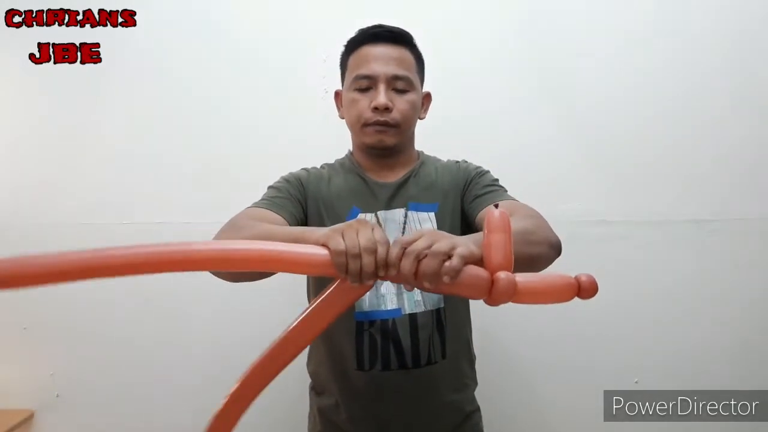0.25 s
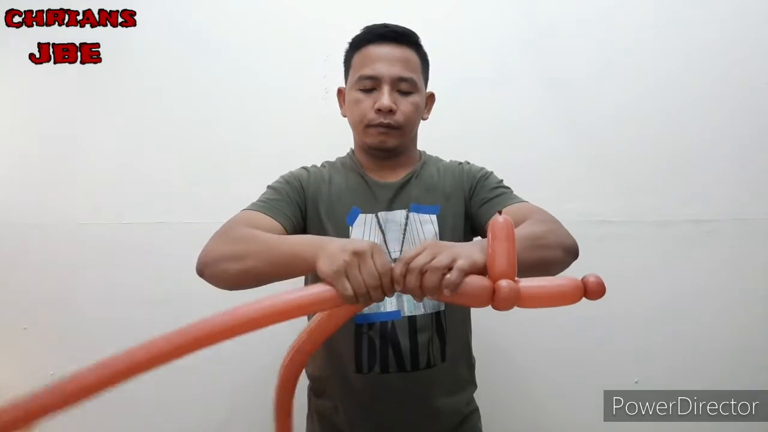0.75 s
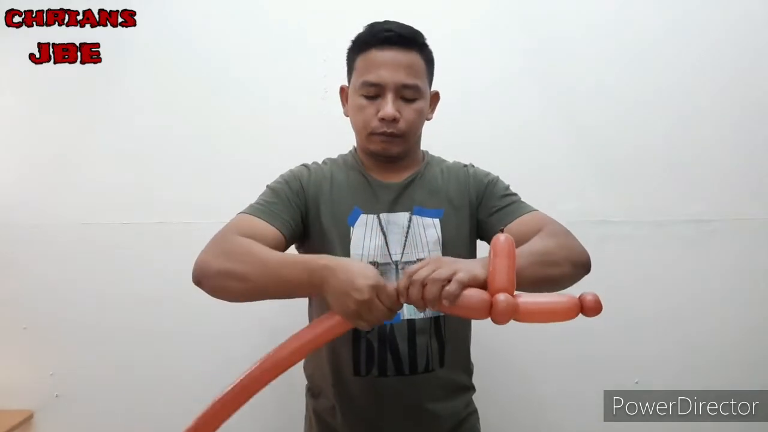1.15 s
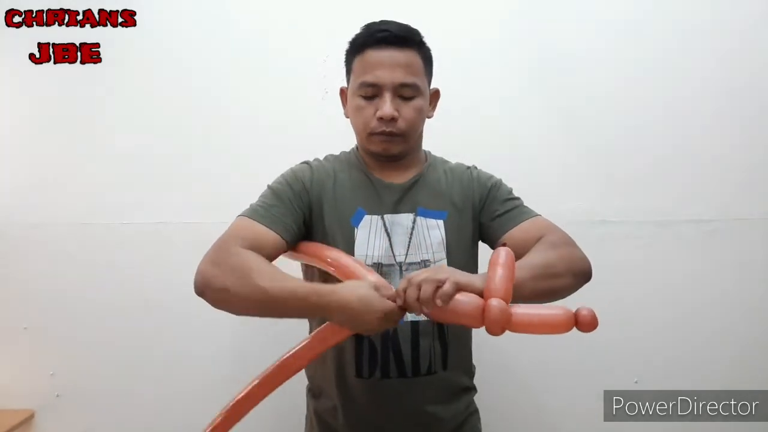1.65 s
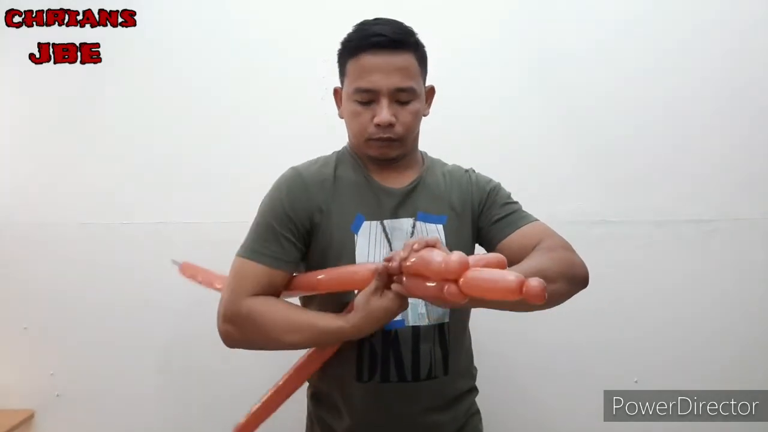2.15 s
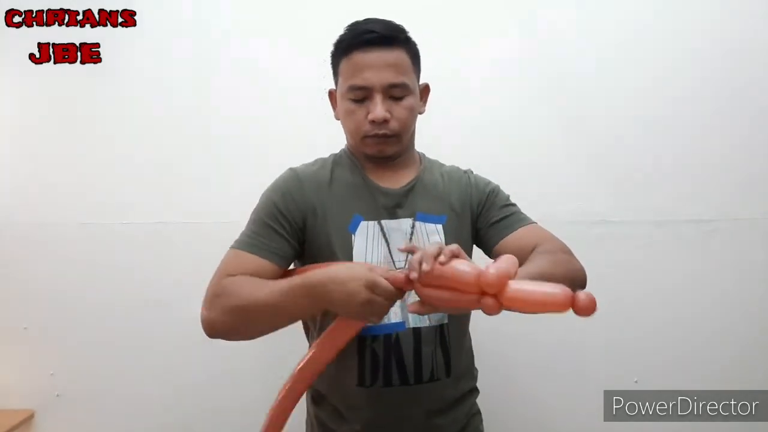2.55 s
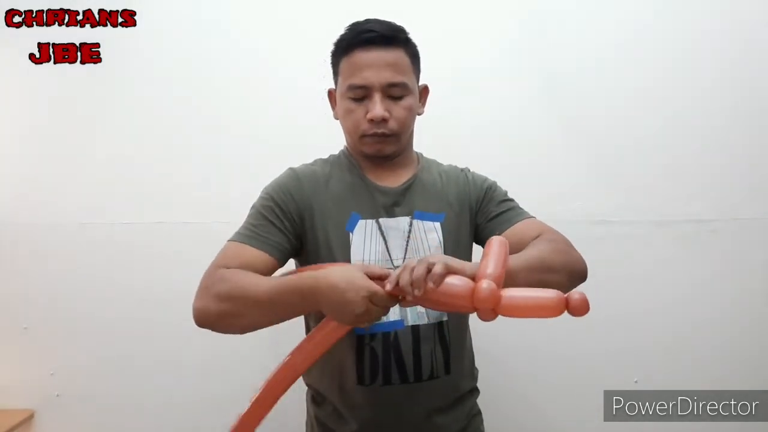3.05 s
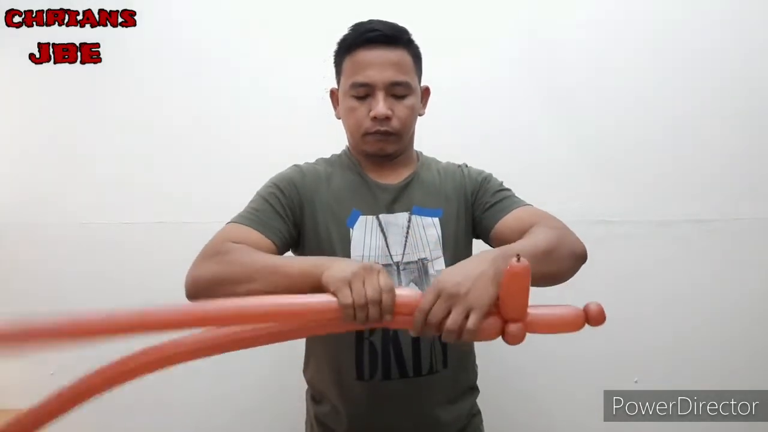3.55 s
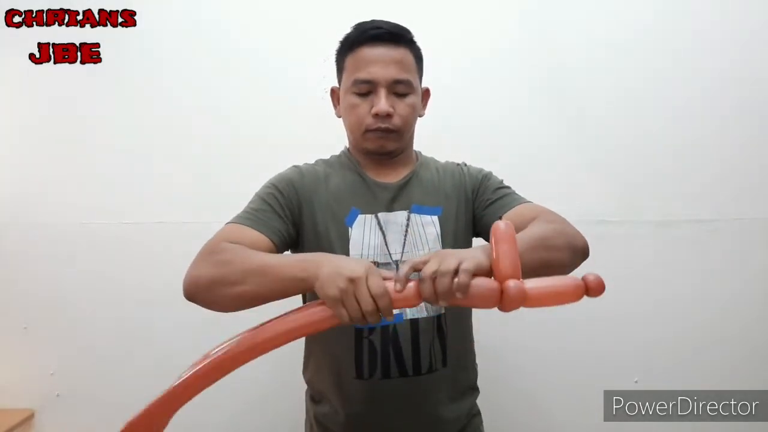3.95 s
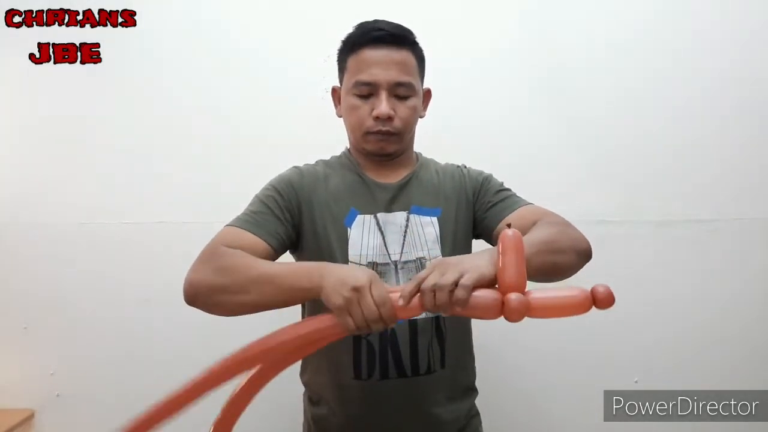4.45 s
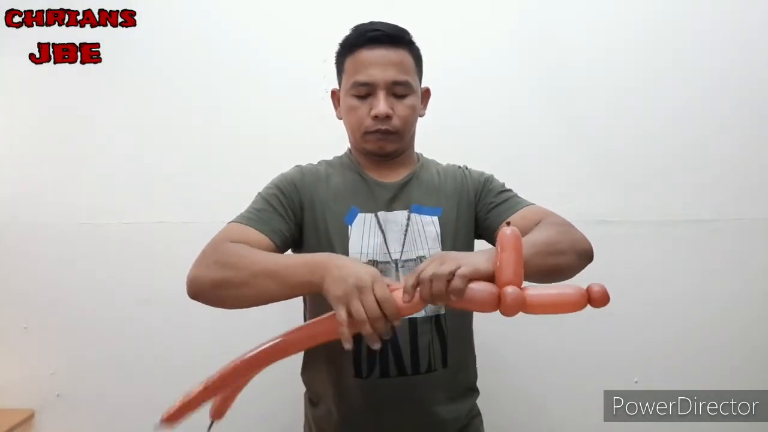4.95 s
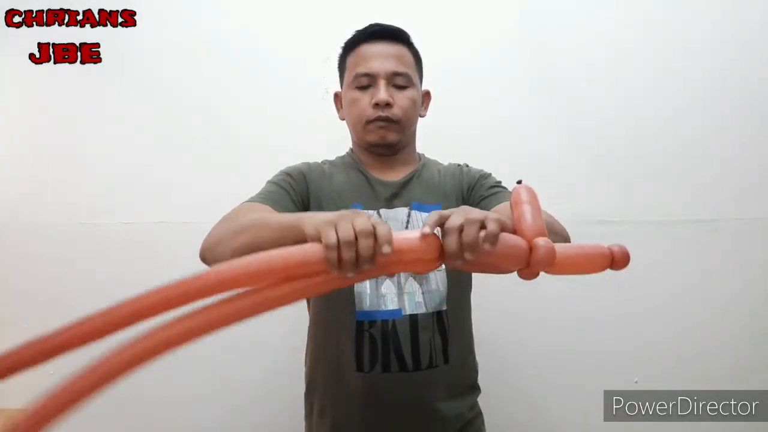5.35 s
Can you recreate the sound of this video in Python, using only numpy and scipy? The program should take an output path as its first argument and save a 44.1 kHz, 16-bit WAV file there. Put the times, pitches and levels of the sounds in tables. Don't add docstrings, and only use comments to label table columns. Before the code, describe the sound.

Hands twist long air-filled latex balloons in a small bare room, a few steps from a phone microphone. A couple of early snaps give way to faint ticks, then finger hiss swells into a dense run of sharp creaks and pops. Duller hollow knocks follow, then scattered snaps, ending with a loud squeaky pop. Walls add short, quickly cut reverberation over faint rumble.

```python
import sys
import numpy as np
from scipy import signal
from scipy.fft import rfft, irfft, next_fast_len
from scipy.io import wavfile
from scipy.ndimage import map_coordinates

SR = 44100
rng = np.random.default_rng(int(sys.argv[2]) if len(sys.argv) > 2 else 0)


def store_pcm(level_fs):
    pcm = np.round(np.clip(level_fs, -1, 1) * 32767).astype(np.int16)
    wavfile.write(sys.argv[1], SR, np.atleast_2d(pcm).T)


def volts_from_decibels(level):
    exponent = np.asarray(level, float) / 20
    return 10 ** exponent


N = 246222

# [f/Hz, level/dB per Hz]
AIR_SPECTRUM = [(22, -29), (38, -12.5), (55, 4), (100, -1), (160, -4), (220, 2.5), (310, -6.5),
                (450, -10.5), (1000, -18.5), (2000, -19), (4500, -33), (8000, -20.5), (10000, -33),
                (16000, -28.5)]
AIR_DB = -67
# [t/s, peak level/dB, f/Hz]
THUDS = [(1.537, -57, 281.5), (1.581, -54, 246), (1.601, -57, 71), (1.69, -53, 320), (2.403, -48, 126),
         (2.55, -61, 69.8), (2.692, -62, 68), (3.2, -67, 61), (3.412, -46, 58.6), (3.408, -33.5, 136.4),
         (3.425, -26, 254.8), (3.55, -39, 282), (3.559, -54.5, 70.4), (4.1, -36, 263), (4.131, -73, 60),
         (5.044, -39, 258), (5.291, -32, 264), (5.297, -53.5, 58.8), (3.196, -27, 516), (2.3, -56, 148.7),
         (2.6, -56.5, 141.5), (4.36, -58, 150)]

# [t/s, hiss level/dB]
STROKES = [
    [(0.9, -93), (1.05, -74.5), (1.24, -71), (1.3, -66), (1.5, -69.5), (1.66, -71.5), (1.78, -60.5),
     (1.988, -53), (2.3, -56.5)],
    [(4.8, -79.5), (4.858, -55), (4.996, -55.5), (5.06, -38)],
    [(3.95, -79), (4.03, -64.5), (4.2, -60), (4.3, -80.5), (4.35, -64), (4.45, -76), (4.6, -83)],
    [(5.48, -90), (5.58, -64.5)],
]
# [f/Hz, level/dB per Hz]
HISS_SPECTRUM = [(2500, -40), (3500, -17.5), (6000, -13.5), (7200, -8), (8200, -2), (9000, -11),
                 (9700, -13.5), (14000, -10.5), (15500, -16), (16300, -35)]
# [f/Hz, level/dB per Hz]
RUSTLE_SPECTRUM = [(290, -8.5), (500, -8.5), (661, -14), (858, -12), (963, -18), (1840, -1.5),
                   (5000, -12.5), (6500, -26), (11000, -120)]
RUSTLE_DB, GRIP_DB = -6, -63.5
LIGHT_DB_PER_DB = 2.1

# [t/s, f/Hz, peak level/dB, hold/s, fade/dB per s]
SQUEAKS = [(.2, 2170, -63, .05, 200), (0.23, 1900, -69, .07, 300), (.94, 596, -70.5, 0.039, 300),
           (3.41, 1900, -30, 0.0089, 300), (3.41, 2350, -33, 0.036, 300), (3.25, 520, -46, 0.029, 148),
           (4.1, 1062, -43, 0.031, 222), (4.365, 1063, -54.5, 0.085, 420), (5.297, 2300, -24.5, 0.042, 325),
           (5.28, 1650, -27, 0.0073, 262.5), (5.39, 2600, -45, 0.029, 300), (5.3, 535, -33.5, 0.031, 158),
           (2.25, 2150, -40, 0.043, 300), (5.3, 2800, -39, 0.039, 152)]
SWELL_S, SAG_PER_DB = 0.018, 0.0008
BREATHY_HZ = 2200

# [t/s, level/dB]
WALLS = [(.0046, 1), (.0066, -1), (0.0122, -2), (0.0141, 2), (0.02, -0.5), (0.021, -10.5)]
# [f/Hz, t60/s]
ROOM_T60 = [(200, 1), (600, 0.81), (2000, 0.67), (5000, 0.67), (12000, 0.65)]
# [f/Hz, likeness/1]
LIKENESS = [(100, 0.44), (400, 0.75), (800, 0.5), (2000, 0.32), (8000, 0.19)]
TAIL = SR // 3
WET_DB = 11

# [f/Hz, level/dB per Hz]
MEMBRANE = [(120, -59), (340, -10), (600, 1), (1000, 3), (2000, 4.5), (3500, -2), (5500, -9.5),
            (9000, -17.5), (20000, -82.5)]
# [f/Hz, level/dB per Hz]
CRACK = [(1200, -46), (3000, -3.5), (5000, -4), (6700, -6), (8100, 1.5), (9400, -13), (13000, -11.5),
         (15500, -17), (20000, -69)]
# [t/s, mode f/Hz]
TUBE = [(0.7, 635), (1.75, 300), (2.24, 722), (2.7, 730), (3.0, 590), (3.2, 580), (3.4, 278), (3.45, 468),
        (3.64, 490), (3.9, 765), (4.1, 534), (4.14, 324), (4.345, 444), (4.63, 382), (4.67, 556),
        (5.04, 507), (5.1, 428), (5.28, 812)]
OTHERS_SHARP = 17
SLACK_TILT = 0.069

# [t/s, peak level/dB, skin mode f/Hz, tube level/dB, crack level/dB]
SNAPS = [(-0.025, -25.5, 2686, -46, -6), (0.11, -26, 1735, -50, -0.5), (0.123, -24, 1930, -20, -9),
         (0.707, -50.5, 1240, -22, -9), (1.249, -54, 2570, -16, 2), (1.751, -48, 1126, -20, -22.5),
         (1.913, -43.5, 1885, -34, -16), (2.599, -16, 2184, -23, -12), (2.656, -28.5, 1660, -25, 5.5),
         (2.828, -35, 2118, -46, 4.5), (2.989, -33, 1525, -24, 5), (3.584, -19.5, 1647, -11.5, -34.5),
         (3.892, -29, 1820, -23, -32.5), (4.098, -22.5, 1592, -12, -7), (4.137, -44, 2473, -0.5, 10.5),
         (4.626, -23.5, 1690, -12.5, -3.5), (4.825, -42.5, 2030, -19, 2.5), (4.949, -51, 2880, -13, 10),
         (4.999, -52.5, 2200, -6, 15), (5.1, -42, 2084, 2.5, -3), (5.278, -1, 1548, -64, -4.5)]
# [t/s, peak level/dB, skin mode f/Hz, tube level/dB, crack level/dB]
FACING = [(0.17, -39.5, 1250, -38, 8.5), (1.993, -39.5, 2130, -38, 11), (2.24, -21.5, 1978, -62, 0.5),
          (2.349, -26, 2140, -22.5, -32), (2.549, -3.5, 1427, -22, -4), (2.684, -6.5, 1639, -33.5, 0.5),
          (2.808, -32.5, 1430, -40, 4.5), (3.165, -20.5, 1666, -20, -23), (3.413, -9.5, 2113, -25, -5.5),
          (3.942, -29.5, 2110, -11, -19), (4.669, -37, 1820, -9, 7), (5.038, -15.5, 1850, -15, -6.5)]
# [t/s, peak level/dB, skin mode f/Hz, tube level/dB, crack level/dB]
SLACK = [
    (3.012, -20.5, 980, -12.5, -11.5),
    (3.196, -15.5, 1370, -7, -18.5),
    (3.403, -18.5, 1334, -6, 0),
    (3.45, -30, 1080, 7, -8),
    (3.542, -24, 1030, -7, -12.5),
    (4.345, -40.5, 794, -7, -28),
    (4.36, -46.5, 857, 0.5, -25),
]
# [t/s, peak level/dB, skin mode f/Hz, tube level/dB, crack level/dB]
NEAREST = [
    (2.366, -22, 1900, -29.5, 1),
    (2.393, -3.5, 1386, -15.5, -6),
    (2.43, -9, 1880, -16.5, -0.5),
    (3.641, -20, 1980, -15.5, -8.5),
]
# [t/s, peak level/dB, skin mode f/Hz, crack level/dB]
TICKS = [
    (.433, -52, 4270, 0),
    (.61, -65.5, 2620, -20),
    (.759, -50, 3500, -2),
    (.902, -59, 3300, -25),
]
TICK_TUBE_DB = -33
# [t/s, peak level/dB]
CREEP = [
    (3.385, -47),
    (4.087, -41),
    (5.024, -38),
    (5.262, -55),
]
# [skin mode f/Hz, tube level/dB, crack level/dB]
CREEP_COLOUR = (2000, -8.5, 3.5)
# [skin mode f/Hz, tube level/dB, crack level/dB]
CREAK_COLOUR = (2060, -14.5, -5)
CREAK_S, CREAK_GAP_S, CREAK_DB, CREAK_SWELL_DB = 2.249, 0.013, -28, 2

# [f/Hz, left minus right level/dB]
LEFT_RE_RIGHT = [(60, 3.5), (250, 2), (1000, 2.5), (4500, 4), (8500, 3), (13000, -2)]
TOP_HZ = 15900


def unit_rms(x):
    return x / np.sqrt(np.mean(x ** 2) + 1e-20)


def along(points, hz):
    f, v = np.transpose(points)
    return np.interp(np.log(hz + 1), np.log(f + 1), v)


def curves(rows):
    s, *cols = np.transpose(rows)
    n = np.arange(round(s[0] * SR), round(s[-1] * SR))
    return n, [np.interp(n / SR, s, c) for c in cols]


def wobble(rate_hz):
    knots = rng.standard_normal(int(N * rate_hz / SR) + 4)
    return map_coordinates(knots, [np.arange(N) * rate_hz / SR])


def filtered(x, response):
    m = next_fast_len(x.shape[-1] + 4096)
    spectrum = rfft(x, m) * response(np.fft.rfftfreq(m, 1 / SR))
    return irfft(spectrum, m)[..., :x.shape[-1]]


def diffuse_pair(length):
    def mid_side(hz):
        turn = np.arccos(np.clip(along(LIKENESS, hz), 0, 1)) / 2
        return np.array([np.cos(turn), np.sin(turn)])

    mid, side = filtered(rng.standard_normal((2, length)), mid_side)
    return np.array([mid + side, mid - side])


def rush(spectrum):
    return unit_rms(filtered(diffuse_pair(N), lambda hz: volts_from_decibels(along(spectrum, hz))))


def air():
    return volts_from_decibels(AIR_DB + .8 * wobble(25)) * rush(AIR_SPECTRUM)


def thuds():
    out, t = np.zeros(N + SR), np.arange(SR // 4) / SR
    for s, db, hz in THUDS:
        band = signal.butter(3, [hz * .76, hz * 1.3], "band", fs=SR, output="sos")
        puff = signal.sosfilt(band, rng.standard_normal(2 * len(t)))[len(t):]
        envelope = volts_from_decibels(db - 60 * t / 0.34) * (1 - np.exp(-t / 0.003))
        out[round(s * SR):][:len(t)] += envelope * unit_rms(puff)
    return out[:N]


def rubbing():
    hiss, rustle, out = rush(HISS_SPECTRUM), rush(RUSTLE_SPECTRUM), np.zeros((2, N))
    grain = volts_from_decibels(1.5 * wobble(90) + 1.2 * wobble(12))
    for rows in STROKES:
        n, (hiss_db,) = curves(rows)
        rustle_db = hiss_db + RUSTLE_DB - LIGHT_DB_PER_DB * np.maximum(GRIP_DB - hiss_db, 0)
        fade = signal.windows.tukey(len(n), .08)
        out[:, n] = fade * grain[n] * (volts_from_decibels(hiss_db) * hiss[:, n] + volts_from_decibels(rustle_db) * rustle[:, n])
    return out


def squeaks():
    def drift(rate_hz):
        return wobble(rate_hz) + 1j * wobble(rate_hz)

    tone, t = np.zeros((2, N)), np.arange(TAIL) / SR
    waver = .6 * drift(120) + .4 * np.array([drift(60), drift(60)])
    for s, hz, db, hold_s, fade_db_per_s in SQUEAKS:
        start = round(s * SR)
        n = start + np.arange(min(TAIL, N - start))
        swell = np.sin(np.pi / 2 * np.minimum(t / SWELL_S, 1))
        effort = swell * volts_from_decibels(-fade_db_per_s * np.maximum(t - SWELL_S - hold_s, 0))
        pitch_hz = hz * (effort + 0.035) ** (SAG_PER_DB * 20 / np.log(10))
        turns = np.exp(2j * np.pi * np.cumsum(pitch_hz) / SR)
        breath = .75 + hz / BREATHY_HZ * waver[:, n]
        tone[:, n] += volts_from_decibels(db) * np.real(breath * (effort * turns)[:len(n)])
    return tone


def room(direct_db, wet_db, hold_s, fall_db_per_s):
    t = np.arange(TAIL) / SR
    clumps = rng.standard_normal(TAIL // 16 + 1).repeat(16)[:TAIL]
    sparse = volts_from_decibels(3 * np.exp(-t / .08) * clumps)
    hz, frames_s, z = signal.stft(diffuse_pair(TAIL) * sparse, SR, nperseg=256)
    decay = volts_from_decibels(-60 * frames_s / along(ROOM_T60, hz)[:, None])
    tail = signal.istft(z * decay, SR, nperseg=256)[1][:, :TAIL]
    tail *= 1 - np.exp(-(t / 0.0037) ** 2)
    tail *= volts_from_decibels(wet_db) / np.linalg.norm(tail, axis=1, keepdims=True)

    stutter = diffuse_pair(160) * .6 + np.diff(diffuse_pair(161))
    stutter *= np.exp(-((t[:160] - .0016) / .0013) ** 2)
    stutter *= .9 / np.linalg.norm(stutter, axis=1, keepdims=True)
    stutter[:, 44:47] += .13
    tail[:, :160] += volts_from_decibels(direct_db) * stutter
    for s, db in WALLS:
        lags_s = s * (1 + .03 * rng.normal()) + rng.normal(0, 4e-5, size=2)
        for port, lag in enumerate(np.round(lags_s * SR).astype(int)):
            tail[port, lag:lag + 160] += volts_from_decibels(db + rng.normal(0, 1)) * stutter[port]
    return tail * volts_from_decibels(-fall_db_per_s * 0.014 * np.logaddexp(0, (t - hold_s) / 0.011))


def causal(gain):
    quefrency = irfft(np.log(gain + 1e-6))
    half = len(quefrency) // 2
    quefrency[1:half] *= 2
    quefrency[half + 1:] = 0
    return irfft(np.exp(rfft(quefrency)))


def slip(skin_hz, tube_hz, tube_db, crack_db):
    hz = np.fft.rfftfreq(4096, 1 / SR)

    def mode(centre, sharp):
        return 1 / (1 + (sharp * (hz / centre - centre / (hz + 1))) ** 2)

    others_hz = skin_hz * np.exp(rng.uniform(-0.996, 1.0, size=5))
    others = sum(mode(f, OTHERS_SHARP) for f in others_hz)
    rings_hz = skin_hz * np.exp(rng.uniform(-.3, 1.4, size=9))
    rings = sum(mode(f, f / 40) for f in rings_hz)
    modes = 0.36 * mode(skin_hz, 52.0) + 0.5 * others + 1.5 * np.tanh(rings) + .5 * mode(skin_hz, 4.5)
    taut = (skin_hz / 1700) ** .65
    skin = volts_from_decibels(along(MEMBRANE, hz / taut)) * (1 + modes)

    tube = volts_from_decibels(tube_db + 25.5) * (mode(tube_hz, 1.84) ** 2 + 0.14 * mode(tube_hz * .55, 2.2))
    tilt_db = SLACK_TILT * (tube_db + 25) * np.log2(1 + hz / 4000)
    crack = volts_from_decibels(crack_db + 2.0 + along(CRACK, hz) + tilt_db)
    low_cut = hz ** 3 / (hz ** 3 + 170 ** 3)
    return causal(np.sqrt(skin ** 2 + tube ** 2 + crack ** 2) * low_cut)


def snaps():
    out = np.zeros((2, N + 3 * TAIL))
    creak = [(CREAK_S + k * CREAK_GAP_S, CREAK_DB + k * CREAK_SWELL_DB, *CREAK_COLOUR) for k in range(5)]
    creep = [(*row, *CREEP_COLOUR) for row in CREEP]
    ticks = [(s, db, hz, TICK_TUBE_DB, crack_db) for s, db, hz, crack_db in TICKS]
    groups = [(SNAPS, 2), (FACING, 7.5), (SLACK, 8), (ticks, 3), (creak, 7), (creep, -8), (NEAREST, 11.5)]
    for table, direct_db in groups:
        for s, db, skin_hz, tube_db, crack_db in table:
            walls = room(direct_db, WET_DB - 0.24 * direct_db, hold_s=0.046, fall_db_per_s=86 - 2.2 * db)
            tube_hz = np.interp(s, *np.transpose(TUBE))
            release = slip(skin_hz, tube_hz, tube_db, crack_db)
            heard = signal.fftconvolve(release[None], walls, axes=1)
            at = TAIL + round(s * SR)
            out[:, at:at + heard.shape[1]] += volts_from_decibels(db + 15.0 - 0.27 * direct_db) * heard
    return out[:, TAIL:TAIL + N]


def scene():
    return air() + thuds() + rubbing() + squeaks() + snaps()


def roll_off(x):
    return signal.sosfilt(signal.butter(12, 16430, fs=SR, output="sos"), x)


def record(dry):
    x = filtered(dry, lambda hz: volts_from_decibels(along(LEFT_RE_RIGHT, hz) * np.array([[.5], [-.5]])))
    x = x / (1 + np.abs(x / .98) ** 12) ** (1 / 12)
    x = filtered(x, lambda hz: np.clip((TOP_HZ - hz) / 600, 0, 1))
    return roll_off(x)


dry = scene()
out = record(dry)
store_pcm(out)
```